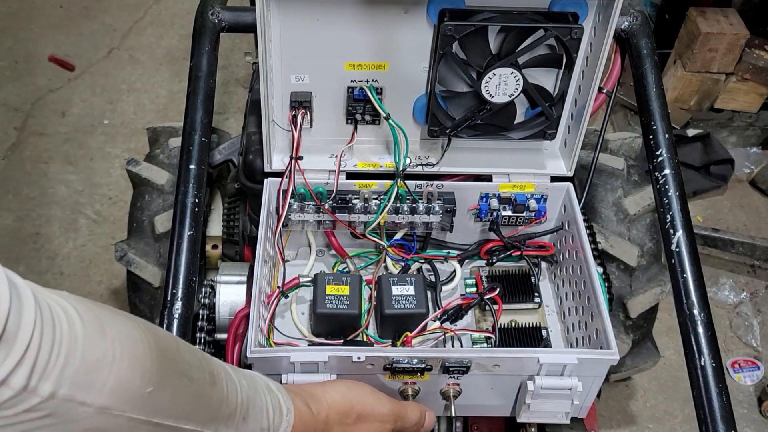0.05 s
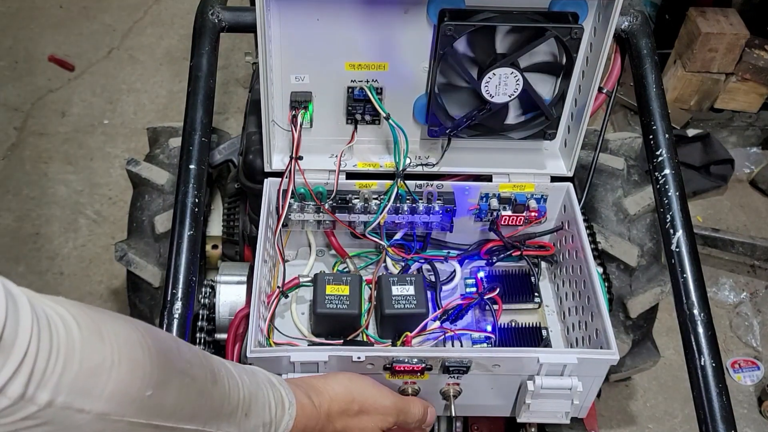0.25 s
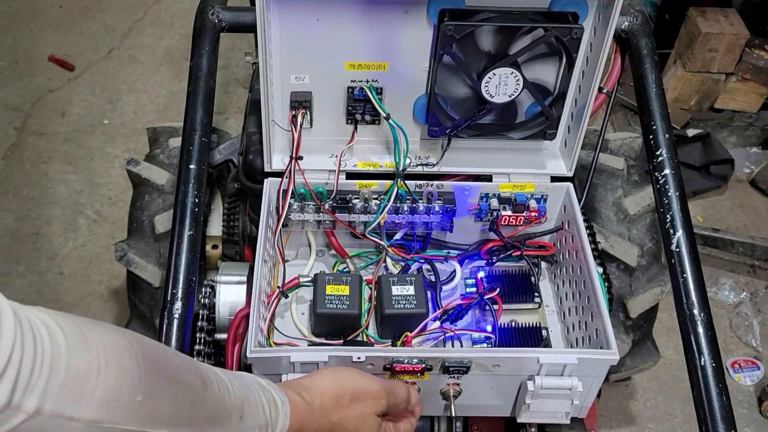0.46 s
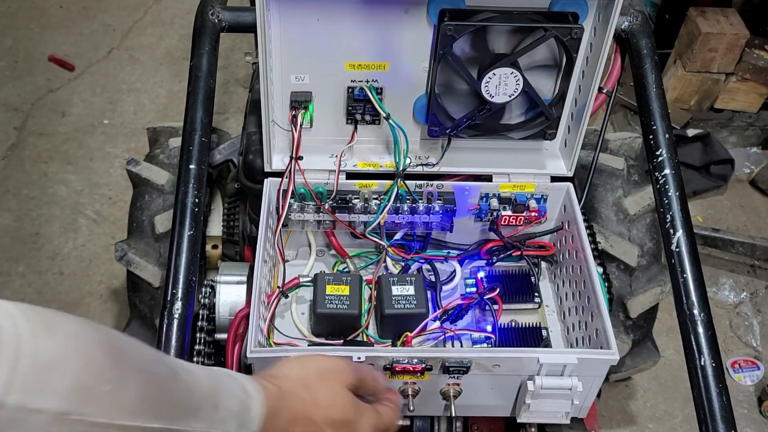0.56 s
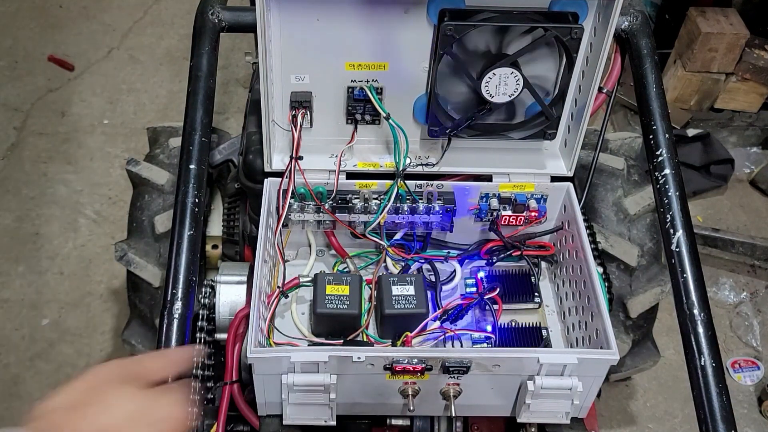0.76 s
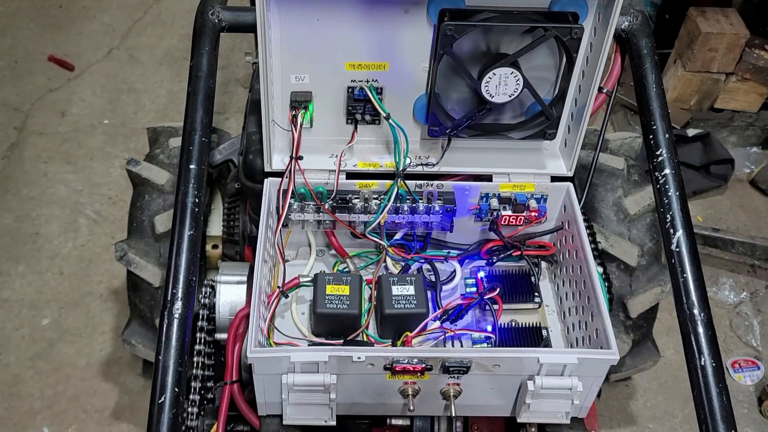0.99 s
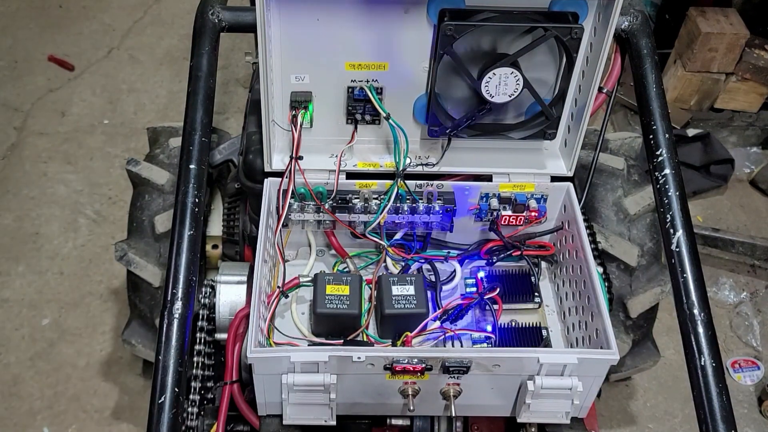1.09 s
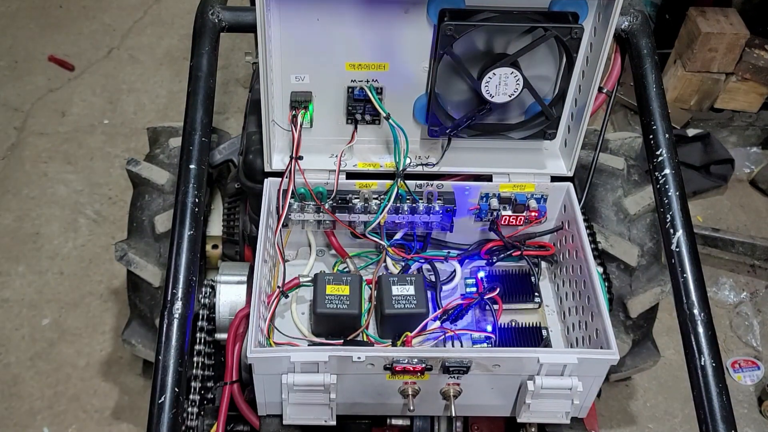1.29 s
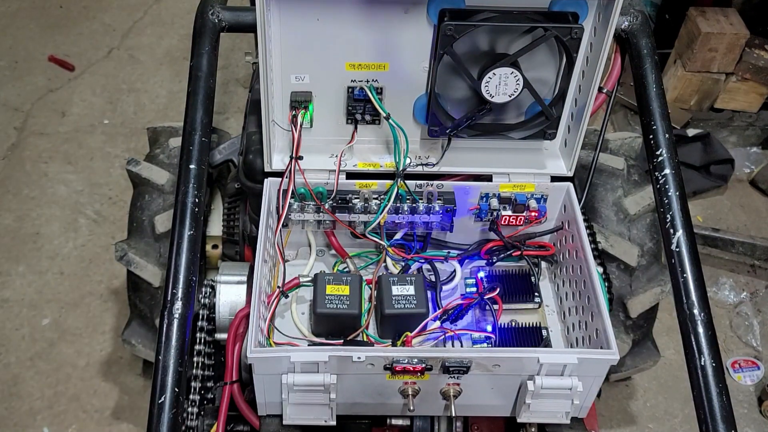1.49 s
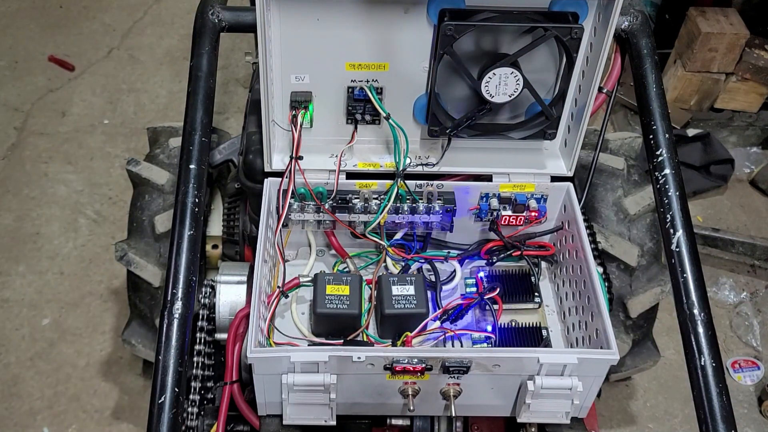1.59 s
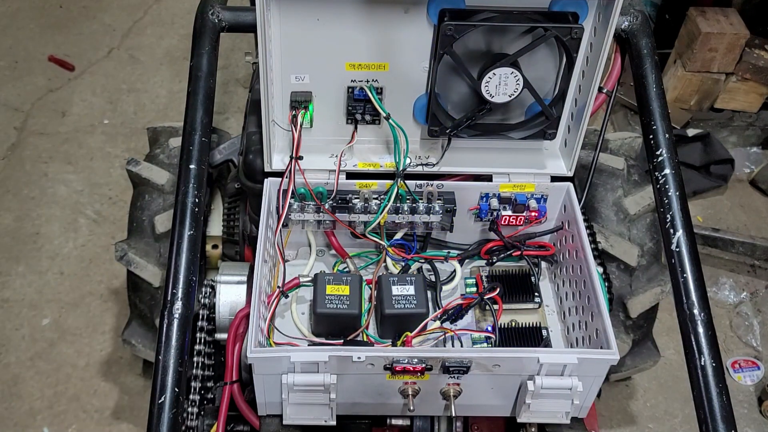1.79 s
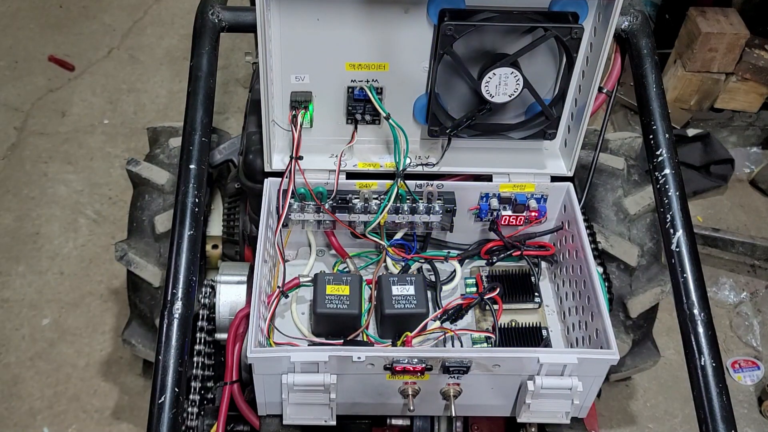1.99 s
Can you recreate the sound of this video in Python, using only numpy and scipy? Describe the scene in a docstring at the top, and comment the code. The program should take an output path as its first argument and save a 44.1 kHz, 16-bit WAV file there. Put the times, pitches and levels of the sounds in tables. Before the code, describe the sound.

A metal toggle switch snaps loudly once on a hollow plastic box, then faint ticks and hum

```python
"""In a garage, a hand throws a metal toggle on a plastic control box. Lever and contacts snap in a quick
burst: impulses ring the hollow panel, short noise bursts rattle the metal, and the room answers both.
Someone moving adds faint ticks (ringing clicks) and scuffs (grainy noise). Behind it all are a low rumble,
a fan's soft hum and a far cricket, each made of filtered noise."""
import sys
import numpy as np
from scipy import signal
from scipy.fft import rfft, irfft, next_fast_len
from scipy.io import wavfile

SR = 44100
rng = np.random.default_rng(int(sys.argv[2]) if len(sys.argv) > 2 else 0)


def store_pcm(level_fs):
    """Save levels as 16-bit WAV."""
    pcm = np.round(np.clip(level_fs, -1, 1) * 32767).astype(np.int16)
    wavfile.write(sys.argv[1], SR, np.atleast_2d(pcm).T)


def makeup_ratio(level_db):
    """Linear amplitude ratio for a level in decibels (20 dB per factor of ten)."""
    decades = np.asarray(level_db, float) / 20
    return 10 ** decades


N = 90404

# colour of the rumble and hiss, relative: (frequency [Hz], density [dB per Hz])
AIR_COLOUR = [(13, -37), (26, -10.5), (40, -11), (60, 0), (80, -5.5), (110, -16), (196, -12.5), (300, -11),
              (450, -23.5), (700, -25.5), (1150, -26.5), (2400, -28.5), (3500, -32), (6000, -33.5),
              (7500, -43), (16500, -54)]
AIR_DB = -64
# how alike left and right are in the background: (frequency [Hz], likeness [0 to 1])
BACKGROUND_ALIKE = [(40, .9), (300, .85), (600, .3), (1200, .05), (12000, .05)]

# loudness of the fan's hum over time: (time [s], level [dB])
FAN_LEVEL = [(0.0, -73), (0.69, -71.5), (0.99, -71.5), (1.38, -72), (1.81, -65), (2.05, -68)]
# the hum's bands, before FAN_POWER narrows them: (centre [Hz], width [Hz], relative level [dB])
FAN_BANDS = [(334.4, 150, -3), (1400, 97, -9)]
FAN_POWER = 2.8

# chirps of a far cricket: (middle [s], half length [s], level [dB])
CHIRPS = [(0.058, 0.055, -80), (0.196, 0.09, -77.5), (0.46, 0.027, -79.5), (.61, .04, -78),
          (0.731, 0.032, -79), (1.013, 0.036, -92), (1.135, 0.039, -79.5), (1.275, 0.055, -78.5),
          (1.431, .04, -79), (1.60, 0.056, -76.5), (1.756, 0.07, -75.5), (1.88, 0.043, -75),
          (2.01, 0.033, -78.5)]
CHIRP_HZ, CHIRP_WIDTH_HZ = 5050, 500  # width of one resonance; it is applied twice

# scuffs, relative levels: (start [s], rise [s], hold [s], level [dB], centre [Hz], broad hiss [dB])
SCUFFS = [(0.008, 0.029, 0.039, -76.5, 4030, -30.5), (0.093, .01, 0.0088, -75.5, 2070, -28),
          (.650, 0.00067, 0.0098, -62, 2170, -4), (0.654, 0.01055, 0.01, -71, 590, -34),
          (0.795, 0.0065, 0.02, -63, 1760, -11.5), (0.8, 0.0031, 0.011, -65.5, 3900, -35),
          (0.81, 0.0043, 0.026, -64, 430, -47), (0.843, 0.0028, 0.017, -66.5, 1900, -21),
          (0.841, 0.0017, 0.0088, -68.5, 2870, -24), (.845, 0.0022, 0.01, -69, 613, -39),
          (0.992, 0.029, 0.012, -73, 2495, 4), (1.041, 0.023, 0.03, -81, 3430, -28),
          (1.693, 0.0058, 0.024, -80, 892, -28.5), (1.763, 0.0093, .025, -71, 2530, -30),
          (1.862, 0.0092, .05, -78.5, 4000, -35)]
SCUFF_FALL_S, SCUFF_OCTAVES = .012, 0.43
GRAINS_PER_S, GRAIN_SPREAD_DB = 1600, 4.5
HISS_HZ, HISS_OCTAVES = 6000, 0.92

# small ticks, relative levels: (time [s], strength [dB], click pitch [Hz], knock pitch [Hz], knock [dB])
TICKS = [(.5005, -42, 2197, 794, -4.5), (.8045, -30, 2195, 442.3, -9), (.8175, -47.5, 1490, 420, 12.5),
         (0.8435, -33.5, 2970, 674, -5), (1.4535, -35, 2860, 430, -7.5), (1.5730, -60.5, 10960, 1287, -14),
         (1.7790, -41.5, 2795, 1980, -12)]
KNOCK_WIDTH_HZ = 130
TICK_RING_WIDTH = 1  # width of the click's ring over its pitch

# blows of the toggle: (time [s], relative blow [dB], softness as roll-off [Hz], metal rattle [dB])
SNAP = [(0.2384, -17.5, 7000, -18), (.2395, -5, 7100, -7), (.2403, -5, 6000, -19.5),
        (.2411, -10.5, 6000, -15.5), (0.2416, 2, 3000, -16), (.2441, -17.5, 3450, -28.5)]
SNAP_DB = 24  # gain of the panel's ring
# resonances of the hollow panel: (centre [Hz], width [Hz], relative level [dB])
PANEL = [(204.7, 60, -17), (430, 66, -20.5), (685.7, 140, -1.5), (1242.4, 690, -1.5), (1769.5, 400, 1.5),
         (2567, 150, -3), (4069, 350, -5.5)]
PANEL_LOW_HZ = 160  # the small panel radiates little below this
# colour of the metal's rattle: (frequency [Hz], relative level [dB])
RATTLE_COLOUR = [(800, -26.5), (1900, -9), (2600, 1), (3150, -8.5), (3800, 2.5), (5000, -6.5), (6300, -6.5),
                 (7900, -2.5), (9500, -7.5), (11000, -16), (12500, -21), (14500, -17.5), (16200, -26)]
# how alike left and right are in the rattle: (frequency [Hz], likeness [0 to 1])
RATTLE_ALIKE = [(3000, .9), (5000, .1), (12000, .05)]
RATTLE_T60_S = .006  # time to fall by 60 dB

# early echoes off the walls: (delay [s], left [dB], right [dB])
WALLS = [(.0062, -9.5, -17.5), (.0090, -11, -9), (0.0118, -18, -19), (0.0145, -18, -11), (.020, -15, -14.5),
         (0.028, -17.5, -24)]
WALL_HZ = 5300  # the echoes are duller above this
# time the room's tail takes to fall by 60 dB: (frequency [Hz], time [s])
ROOM_T60 = [(150, .2), (400, .3), (1000, .235), (2800, .27), (5000, .225), (8000, .185), (11000, .175),
            (15000, .165)]
# colour of the room's tail: (frequency [Hz], relative level [dB])
ROOM_TONE = [(150, 4), (330, -1.5), (450, 5), (560, -2), (740, 4.5), (1300, -1.5), (2600, 1), (3800, 1),
             (6000, 0.5), (9000, -3), (12000, 0), (15000, 3)]
# how alike left and right are in the tail: (frequency [Hz], likeness [0 to 1])
ROOM_ALIKE = [(300, .9), (1000, .45), (2500, .05), (12000, .02)]
ROOM_DB, ROOM_START_S = -3.5, .003

TICK_LEAD_S, SCUFF_LEAD_S = .00027, .00012  # small sounds come from the left: it leads the right by this
SMALL_DRY_DB, SMALL_WET_DB = 3, 7  # gain of the small sounds, direct and into the room
TOP_HZ = 16300


def along(points, hz):
    """Read a (frequency, value) table at hz, on a log frequency axis."""
    f, v = np.transpose(points)
    return np.interp(np.log(hz + 1), np.log(f + 1), v)


def unit(x):
    """Scale to rms 1."""
    return x / np.sqrt(np.mean(x ** 2) + 1e-20)


def curve(rows):
    """Turn a (time, value) table into one value per sample."""
    return np.interp(np.arange(N) / SR, *np.transpose(rows))


def filtered(x, response):
    """Multiply the spectrum of x by a response, a function of frequency."""
    m = next_fast_len(x.shape[-1] + SR // 2)  # spare room for ringing
    spectrum = rfft(x, m) * response(np.fft.rfftfreq(m, 1 / SR))
    return irfft(spectrum, m)[..., :x.shape[-1]]


def peaks(table, hz):
    """Sum of resonances that ring only after being struck, with alternating signs."""
    total = 0
    for k, (centre, width, db) in enumerate(table):
        damping = 1j * hz * width
        total = total + (-1) ** k * makeup_ratio(db) * damping / (centre ** 2 - hz ** 2 + damping)
    return total


def blow(s, db, soft_hz, hz):
    """Spectrum of one impulse at time s; a softer contact loses treble above soft_hz."""
    delay = np.exp(-1j * 2 * np.pi * hz * s)
    return makeup_ratio(db) * delay / (1 + 1j * hz / soft_hz) ** 3


def stereo(pair, alike, gain):
    """Mix two unrelated noises into a left and right of given likeness and colour."""
    def mix(hz):
        turn = np.arccos(np.clip(along(alike, hz), -1, 1)) / 2
        return gain(hz) * np.array([np.cos(turn), np.sin(turn)])
    mid, side = filtered(pair, mix)
    return np.array([mid + side, mid - side])


def background_noise(gain):
    """Stereo noise of rms 1, coloured by gain."""
    return unit(stereo(rng.standard_normal((2, N)), BACKGROUND_ALIKE, gain))


def air():
    """Low rumble and hiss: steady noise with a fixed colour."""
    return makeup_ratio(AIR_DB) * background_noise(lambda hz: makeup_ratio(along(AIR_COLOUR, hz)))


def fan():
    """The fan's hum: noise in narrow bands, with a slowly changing level."""
    hum = background_noise(lambda hz: np.abs(peaks(FAN_BANDS, hz)) ** FAN_POWER)
    return makeup_ratio(curve(FAN_LEVEL)) * hum


def cricket():
    """Far chirps: one narrow band of noise swelling and fading smoothly."""
    t = np.arange(N) / SR
    swells = sum(makeup_ratio(db) * np.exp(-((t - middle) / half) ** 4) for middle, half, db in CHIRPS)
    return swells * background_noise(lambda hz: peaks([(CHIRP_HZ, CHIRP_WIDTH_HZ, 0)], hz) ** 2)


def scuffs():
    """Dense grit under a rise, hold and fall, coloured around a centre, with some broad hiss."""
    t, out = np.arange(N) / SR, np.zeros(N)

    def bell(hz, centre, octaves):
        return np.exp(-.5 * (np.log2((hz + 1) / centre) / octaves) ** 2)

    for start, rise, hold, db, centre, hiss_db in SCUFFS:
        is_grain = rng.random(N) < GRAINS_PER_S / SR
        grains = is_grain * makeup_ratio(GRAIN_SPREAD_DB * rng.exponential(size=N))
        grit = rng.standard_normal(N) * (1.2 + grains)  # the 1.2 is steady noise between the grains
        hiss = makeup_ratio(hiss_db - 7.5)
        grit = unit(filtered(grit, lambda hz: bell(hz, centre, SCUFF_OCTAVES)
                             + hiss * bell(hz, HISS_HZ, HISS_OCTAVES)))
        swell = np.clip((t - start) / max(rise, .001), 0, 1)
        fall = np.exp(-np.clip(t - start - rise - hold, 0, None) / SCUFF_FALL_S)
        out += makeup_ratio(db) * grit * swell * fall
    return out


def ticks():
    """Each tick is an impulse ringing two resonances: a short dull click and a hollow knock."""
    def spectrum(hz):
        total = 0
        for s, db, click, knock, knock_db in TICKS:
            rings = [(knock, KNOCK_WIDTH_HZ, knock_db + 19.5), (click, TICK_RING_WIDTH * click, 4)]
            total = total + blow(s, db + 6, 1.74 * click, hz) * peaks(rings, hz)
        return total
    impulse = (np.arange(N) < 1).astype(float)
    return filtered(impulse, spectrum)


def panel_ring():
    """The toggle's blows ring the resonances of the hollow panel."""
    def spectrum(hz):
        blows = sum(blow(s, db, soft_hz, hz) for s, db, soft_hz, _ in SNAP)
        radiation = (1j * hz / (PANEL_LOW_HZ + 1j * hz)) ** 2
        return peaks(PANEL, hz) * radiation * blows
    impulse = (np.arange(N) < 1).astype(float)
    return makeup_ratio(SNAP_DB) * filtered(impulse, spectrum)


def metal_rattle():
    """Each blow also sets off a burst of bright noise that dies within milliseconds."""
    t = np.arange(N) / SR
    metal = unit(stereo(rng.standard_normal((2, N)), RATTLE_ALIKE, lambda hz: makeup_ratio(along(RATTLE_COLOUR, hz))))
    bursts = sum((t >= s) * makeup_ratio(db - 60 * np.abs(t - s) / RATTLE_T60_S) for s, _, _, db in SNAP)
    return metal * bursts


def toggle():
    """Lever, spring and contacts strike within a few ms: the panel rings and the metal rattles."""
    return panel_ring() + metal_rattle()


def room(x):
    """A few dull early walls, then a noise tail dying at its own speed per frequency."""
    hz, t, z = signal.stft(rng.standard_normal((2, SR // 2)), SR, nperseg=256)
    decay = makeup_ratio(-60 * t / along(ROOM_T60, hz)[:, None])
    tail = signal.istft(z * decay, SR, nperseg=256)[1]
    tail = tail / np.linalg.norm(tail[0])
    tail = makeup_ratio(ROOM_DB) * stereo(tail, ROOM_ALIKE, lambda f: makeup_ratio(along(ROOM_TONE, f)))
    tail = np.roll(tail, round(ROOM_START_S * SR), axis=1)
    walls = np.zeros_like(tail)
    for s, left_db, right_db in WALLS:
        walls[:, round(s * SR)] = makeup_ratio([left_db, right_db])
    walls = filtered(walls, lambda f: 1 / (1 + 1j * f / WALL_HZ))
    return signal.fftconvolve(x, tail + walls, axes=1)[:, :N]


def from_left(x, lead_s):
    """Sound from the left reaches the left side lead_s earlier than the right."""
    sides = np.array([[1], [-1]])
    return filtered(x, lambda hz: np.exp(1j * np.pi * hz * lead_s * sides))


def scene():
    """Background, then small sounds and toggle, each with its own answer of the room."""
    background = air() + fan() + cricket()
    scuff, tick, snap = scuffs(), ticks(), toggle()
    near = from_left(tick, TICK_LEAD_S) + from_left(scuff, SCUFF_LEAD_S)
    small = makeup_ratio(SMALL_DRY_DB) * near + makeup_ratio(SMALL_WET_DB) * room((tick + scuff)[None])
    return background + small + snap + room(snap)


def roll_off(x):
    """The treble ends steeply here."""
    return signal.sosfilt(signal.butter(12, 16640, fs=SR, output="sos"), x)


def record(dry):
    """Round off the loudest peaks under a soft ceiling, then cut everything from TOP_HZ up."""
    limited = dry / (1 + np.abs(dry / .99) ** 8) ** (1 / 8)
    mix = filtered(limited, lambda hz: hz < TOP_HZ)
    return roll_off(mix)


dry = scene()
out = record(dry)
store_pcm(out)
```